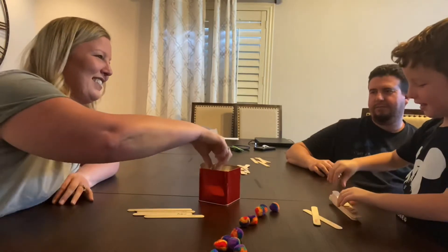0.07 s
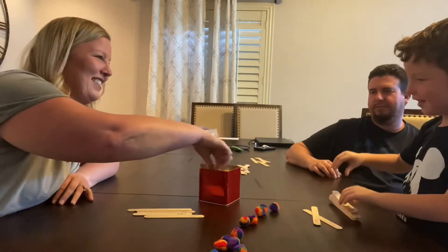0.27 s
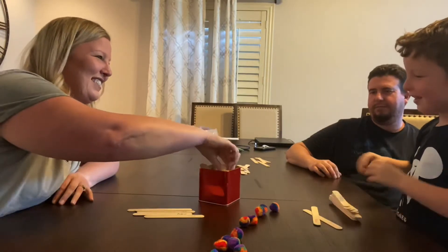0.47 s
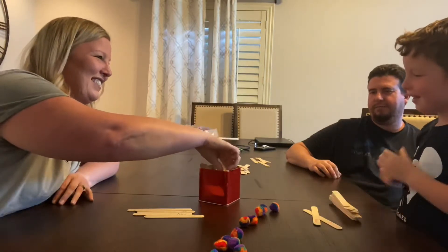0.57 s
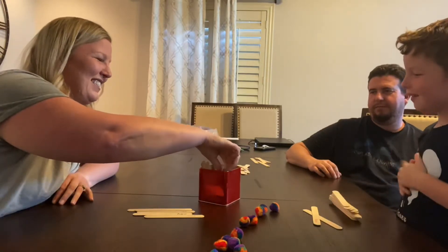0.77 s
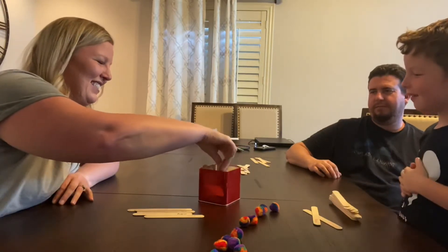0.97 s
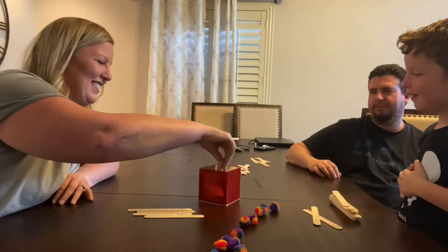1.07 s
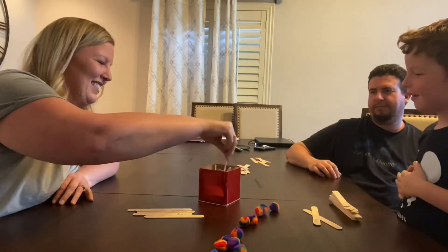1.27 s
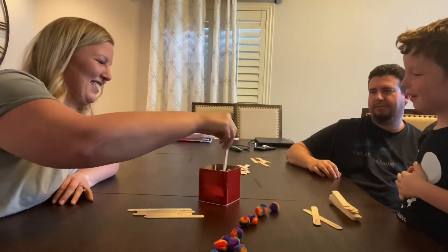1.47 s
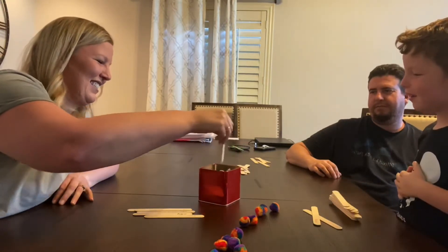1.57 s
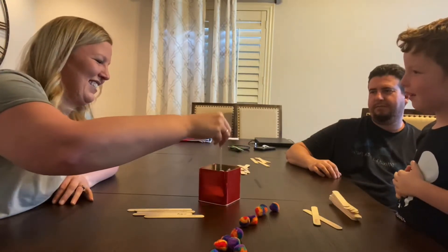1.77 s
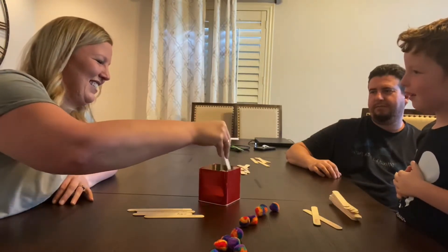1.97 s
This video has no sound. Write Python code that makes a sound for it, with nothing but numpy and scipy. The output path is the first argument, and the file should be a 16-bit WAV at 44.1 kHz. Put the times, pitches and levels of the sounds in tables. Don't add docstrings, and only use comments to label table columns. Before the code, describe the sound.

Wooden craft sticks rattle in a small metal tin. Faint taps come at 0.05-0.2 s, then a pause; scraping and light knocks run from 0.45 to 0.9 s. Sharper hollow clacks fall at 1.0-1.16 s, with scraping fading by 1.4 s. After a lull, a scrape and table thump near 1.85 s lead to the loudest knock at 1.95 s. Bare room; low household hum fades late.

```python
import sys
import numpy as np
from scipy import signal
from scipy.fft import rfft, irfft, next_fast_len
from scipy.io import wavfile
from scipy.ndimage import uniform_filter1d

SR = 44100
rng = np.random.default_rng(int(sys.argv[2]) if len(sys.argv) > 2 else 0)


def digitize_waveform(pressure):
    field = np.atleast_2d(pressure).T
    bounded = np.clip(field, -1, 1)
    quanta = np.round(bounded * 32767).astype(np.int16)
    wavfile.write(sys.argv[1], SR, quanta)


def rack_gain(trim_db):
    fader = np.asarray(trim_db, float)
    return 10 ** (fader / 20)


N = 89126
TIME = np.arange(N) / SR
LONGEST_T60_S = 0.11


def curve(table, hz):
    table_hz, value = np.array(table, float).T
    return np.interp(np.log(np.maximum(hz, 1)), np.log(table_hz), value)


def colour(x, table):
    n = x.shape[-1]
    gain = rack_gain(curve(table, np.arange(n // 2 + 1) * SR / n))
    return irfft(rfft(x) * gain, n) / np.sqrt(np.mean(gain ** 2))


def ring(x, hz, t60):
    pole = np.exp(2j * np.pi * hz / SR - np.log(1000) / (max(t60, 0.003) * SR))
    return signal.lfilter([1], [1, -pole], x).imag


def struck(modes, rise_s):
    hz, gain, t60 = np.array(modes).T[:, :, None]
    t = np.arange(SR // 4) / SR
    fade = rack_gain(-60 * t / np.clip(t60, 0.005, LONGEST_T60_S))
    tones = gain * np.sin(2 * np.pi * hz * t) * fade
    return np.sum(tones, axis=0) * (1 - np.exp(-t / rise_s))


def walk(rate):
    k = int(SR / rate)
    wander = uniform_filter1d(uniform_filter1d(rng.standard_normal(N), k), k)
    return wander / wander.std()


# (time [s], level [dB])
RUMBLE = [(0, -0.5), (.4, 1.5), (.8, -1), (1.2, -1), (1.601, -5), (2.02, -13.5)]
# (frequency [Hz], level [dB per Hz])
HUM = [(25, -26), (60, -6), (120, -3), (200, 0), (300, -8), (700, -22), (2000, -38), (15000, -50)]


def hum():
    s, db = np.array(RUMBLE).T
    swell = rack_gain(np.interp(TIME, s, db) + 1.5 * walk(15))
    air = colour(rng.standard_normal((2, N)), HUM) * swell
    drone = ring(rng.standard_normal((2, N)), 188.5, 1.1 / 8.9)
    middle_db, side_db = -63.5, -70.5
    return (air + rack_gain(-8) * drone / drone.std()) * rack_gain(np.array([[middle_db], [side_db]]))


# (frequency [Hz], time to fall 60 dB [s])
ROOM_T60 = [(100, 0.51), (500, 0.2), (1500, 0.33), (4000, 0.19), (9000, 0.16), (15000, 0.067)]
# (frequency [Hz], side level against middle [dB])
ROOM_SIDE = [(100, -14), (700, 0), (1500, -4.5), (4000, 2), (8000, -12.5), (15000, -24)]


def room(x):
    delay_s, room_db = 0.00415, -4
    n = SR // 2 * 2
    t = np.arange(n) / SR - delay_s
    hz = np.arange(n // 2 + 1) * SR / n
    noise = rfft(rng.standard_normal((2, n)))
    tail = 0
    for centre_hz in 62.5 * 2.0 ** np.arange(9):
        octave = np.clip(1 - np.abs(np.log2(np.maximum(hz, 1) / centre_hz)), 0, 1)
        fade = rack_gain(-60 * t / curve(ROOM_T60, centre_hz)) * (t > 0)
        width = rack_gain(np.array([[0], [curve(ROOM_SIDE, centre_hz)]]))
        tail = tail + irfft(noise * octave, n) * fade * width
    tail = tail / np.sqrt(np.sum(tail[0] ** 2))
    return signal.fftconvolve(x[None], tail, axes=1)[:, :N] * rack_gain(room_db)


# (time [s], level [dB], lowest table mode [Hz])
THUMPS = [
    (.56, -34, 198.2),
    (.585, -41.5, 185),
    (1.077, -37.5, 158),
    (1.879, -25, 202),
    (1.886, -39.5, 205),
    (1.894, -22, 220),
    (1.953, -47.5, 67),
]


def thumps():
    out = np.zeros(N + SR)
    for s, db, hz in THUMPS:
        t60 = 0.031 * 200 / hz
        table_top = [(hz * ratio, gain, t60) for ratio, gain in [(1, 0.2), (1.5, 0.84), (2.1, 1.0), (2.65, 1.0)]]
        cut = signal.butter(3, 0.8 * hz, "high", fs=SR, output="sos")
        i = int(s * SR)
        out[i:i + SR // 4] += rack_gain(db) * signal.sosfilt(cut, struck(table_top, 0.0023))
    return out[:N]


# (time [s], level [dB])
SLIDE = [(0, -131), (0.048, -71), (0.198, -73.5), (.28, -142), (0.438, -88), (0.458, -56), (.6, -70),
         (.7, -66), (.9, -64), (1.06, -65), (1.101, -53.5), (1.238, -55), (1.28, -58.5), (1.34, -58),
         (1.418, -76.5), (1.81, -91.5), (1.839, -49.5), (2.02, -47.5)]
# (frequency [Hz], level [dB])
CRACK = [(300, -24), (1000, 1), (2500, 3.5), (4500, 5.5), (7000, -1), (10000, -2), (13000, -4.5),
         (15500, -13)]


def slide():
    catches_per_s, tin_db, hiss_db = 1500, -5, -5.5
    s, db = np.array(SLIDE).T
    effort = rack_gain(np.interp(TIME, s, db) + 0.83 * walk(60))
    caught = rng.random(N) < catches_per_s / SR
    catch = caught * rack_gain(2.5 * rng.exponential(size=N)) * rng.standard_normal(N)
    hiss = colour(catch / catch.std() + 0.73 * rng.standard_normal(N), CRACK)
    return effort * catch * rack_gain(tin_db), effort * hiss * rack_gain(hiss_db)


def cracks(clicks):
    rise_s, fade_s = 0.0012, 0.0054
    power = uniform_filter1d(clicks, int(rise_s * SR))
    power = signal.lfilter([1], [1, -np.exp(-2 / (fade_s * SR))], power)
    return np.sqrt(np.abs(power)) * colour(rng.standard_normal(N), CRACK)


# (frequency [Hz], level [dB], time to fall 60 dB [s])
TIN = [(381.6, -18, 0.24), (576, -9.5, 0.099), (666, -8.5, 0.14), (720.4, -4, .06), (910, -6.5, .1),
       (1255, -11, 0.074), (1417, -19, 0.3), (1632, -12.5, 0.053), (2005, -7.5, 0.075), (2155, -13, 0.077),
       (2467, -11, 0.067), (2854, -18.5, 0.1), (3720, -18, 0.063), (4172, -16.5, 0.029)]


def dragged_tin(drag):
    return sum(rack_gain(db) * ring(drag, hz, min(t60, LONGEST_T60_S) / 2) for hz, db, t60 in TIN)


def knock_modes(stick_hz, upper_db):
    stick_db, stick_t60, tin_db = -5, 0.075, -17
    modes = [(stick_hz, rack_gain(stick_db), stick_t60)]
    for chance in rng.standard_normal(4):
        modes.append((stick_hz * np.exp(0.1 * chance), rack_gain(stick_db - 11), stick_t60))
    for hz, db, t60 in TIN:
        detune, spot, twin = rng.standard_normal(3)
        upper = upper_db + 17 if hz > 1100 else 0
        gain = rack_gain(tin_db + db + 4 * spot + upper)
        modes.append((hz * (1 + 0.006 * detune), gain, t60))
        modes.append((hz * (1 + 0.04 * twin), gain * 2.1, t60 / 2))
    return modes


# (time [s], peak level [dB], stick pitch [Hz], crack level [dB], upper tin modes level [dB])
KNOCKS = [(0.061, -38.5, 600, -33, -14), (0.084, -49, 952, -50, -41), (0.162, -43.5, 900, -33, -14.5),
          (0.184, -45.5, 598, -58, -23), (0.451, -37, 926, -30, -5.5), (0.535, -37.5, 941, -24.5, -5),
          (0.557, -34.5, 777, -22, -8.5), (0.584, -40.5, 949, -35, -4), (0.745, -42.5, 852, -51, -39),
          (0.77, -38, 803, -32.5, -14.5), (0.818, -31, 894, -27, -6.5), (0.874, -46, 714, -26, -31),
          (0.997, -23.5, 802, -35, -15), (1.012, -46, 818, -32, 3.5), (1.076, -30.5, 735, -16, -7.5),
          (1.086, -28.5, 762, -44, -3), (1.161, -19.5, 922, -31.5, -9), (1.3, -35.5, 766, -20, -7.5),
          (1.33, -37, 912, -29.5, -19), (1.831, -38.5, 918, -11, -2), (1.879, -27, 873, -16, -47),
          (1.892, -22.5, 763, -31.5, -48), (1.945, -15, 887, -20.5, -15), (1.969, -28.5, 894, -19, -8)]


def knocks():
    bounce_s, crack_gain_db = 0.03, 9.5
    out, crack = np.zeros(N + SR), np.zeros(N + SR)
    for s, db, stick_hz, crack_db, upper_db in KNOCKS:
        for landing in range(3):
            if landing == 0:
                late, size = np.zeros(1), np.array([rack_gain(db)])
            else:
                late = np.cumsum(np.abs(rng.standard_normal(8))) * bounce_s / 3
                size = rack_gain(db - 13 + 4 * rng.standard_normal(8)) * np.exp(-late / bounce_s)
            hit = np.zeros(SR // 2)
            direction = np.sign(rng.standard_normal(len(late)))
            np.add.at(hit, (late * SR).astype(int), size * direction)
            sound = signal.fftconvolve(hit, struck(knock_modes(stick_hz, upper_db), 0.0026))
            i = int(s * SR)
            out[i:i + len(sound)] += sound
            crack[i:i + len(hit)] += (rack_gain(crack_db + crack_gain_db) * hit) ** 2
    return out[:N] + cracks(crack[:N])


def scene():
    drag, hiss = slide()
    low_cut = signal.butter(2, 252, "high", fs=SR, output="sos")
    dry = signal.sosfilt(low_cut, knocks() + dragged_tin(drag) + hiss) + thumps()
    mid, side = room(dry) + hum()
    return np.array([dry + mid + side, dry + mid - side])


# (frequency [Hz], phase [rad])
PORT_PHASE = [(100, 0), (2670, -.25), (3300, -1.1), (6000, -1.4), (7900, 0), (10300, 3.14), (13000, 6.3),
              (15100, 9.6)]


def ports(dry):
    hz, rad = np.array(PORT_PHASE).T
    n = next_fast_len(N + 4096)
    phase = np.interp(np.arange(n // 2 + 1) * SR / n, hz, rad)
    turn = np.exp(1j * phase / 2) * rack_gain(0.7 / 2)
    return irfft(rfft(dry, n) * np.array([turn, 1 / turn]), n)[:, :N]


def top_cut(x):
    return signal.sosfilt(signal.butter(12, 15510, fs=SR, output="sos"), x)


def record(dry):
    mix = ports(dry)
    return top_cut(mix)


dry = scene()
out = record(dry)
digitize_waveform(out)
```